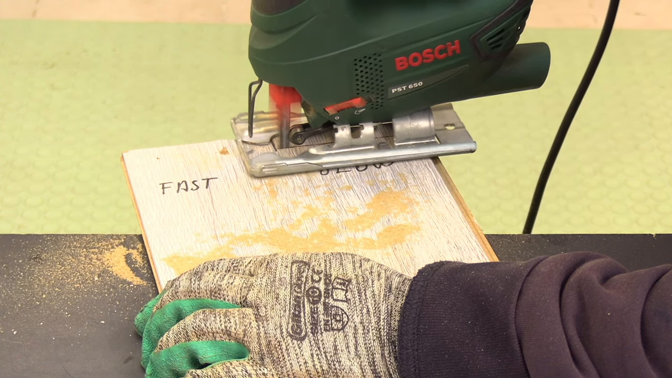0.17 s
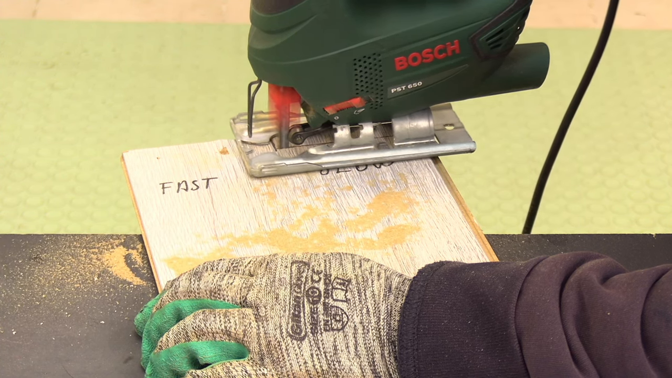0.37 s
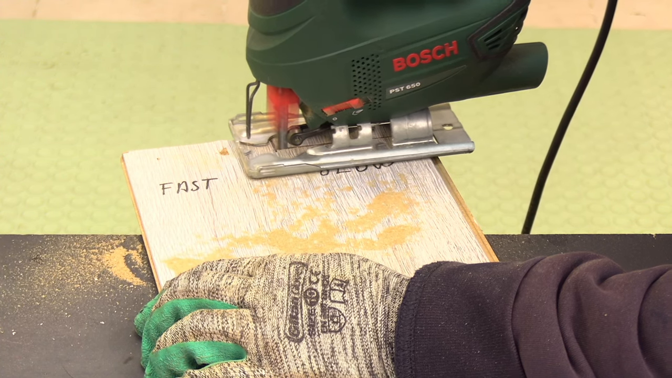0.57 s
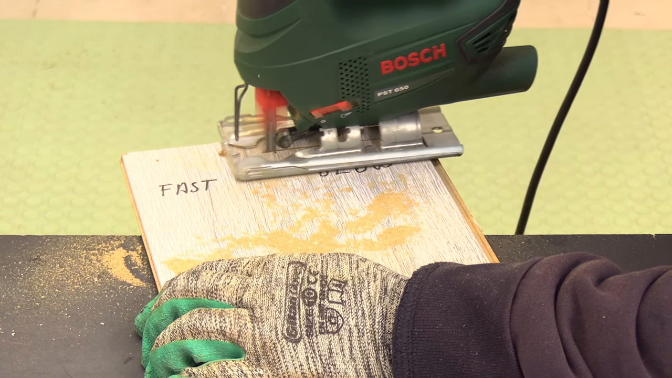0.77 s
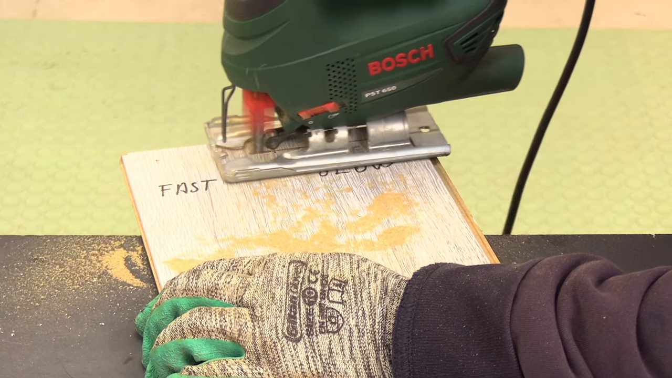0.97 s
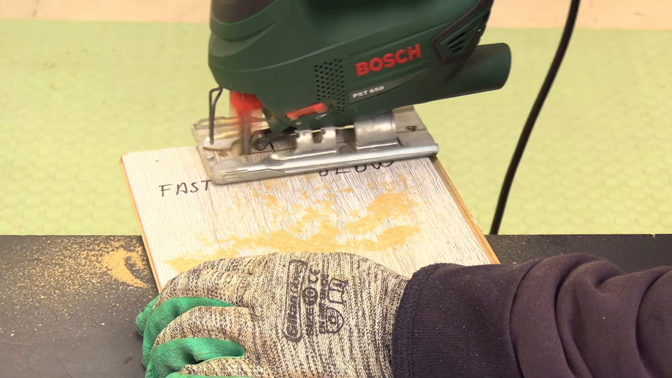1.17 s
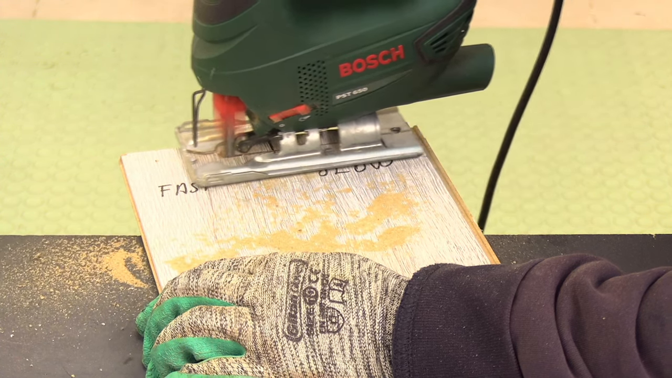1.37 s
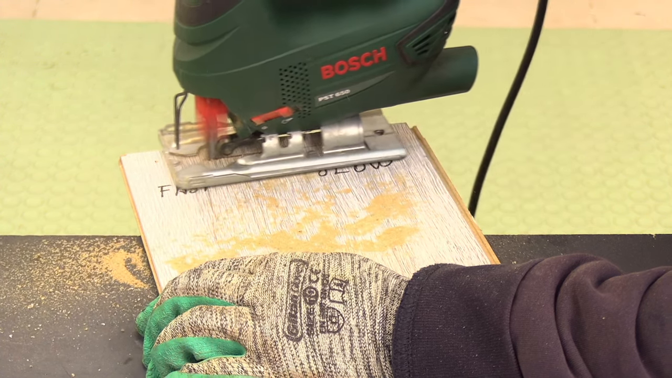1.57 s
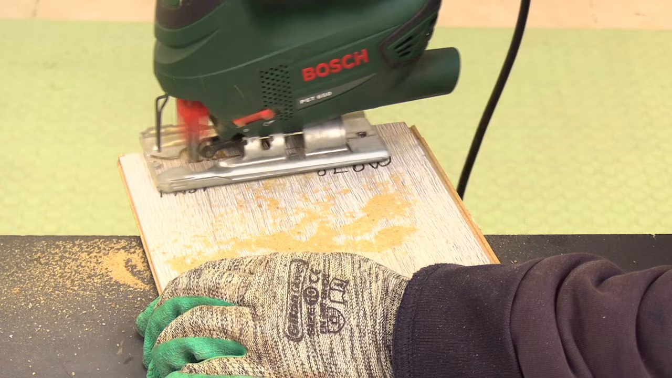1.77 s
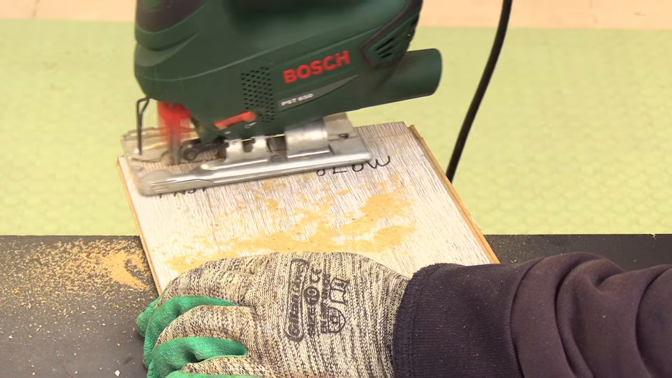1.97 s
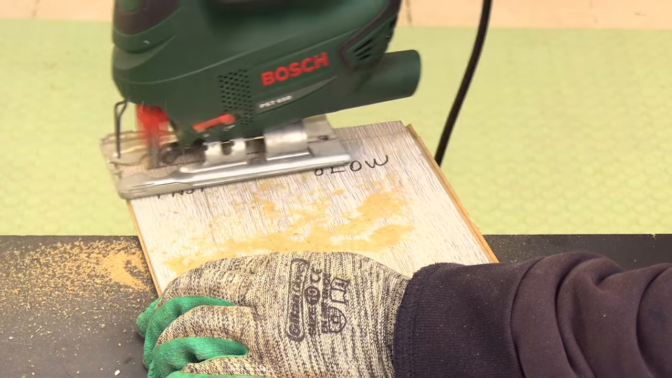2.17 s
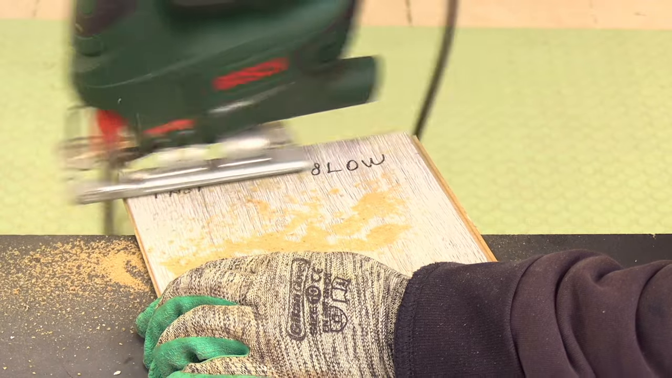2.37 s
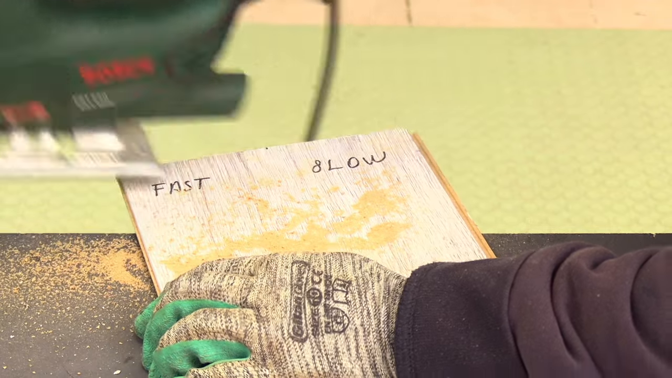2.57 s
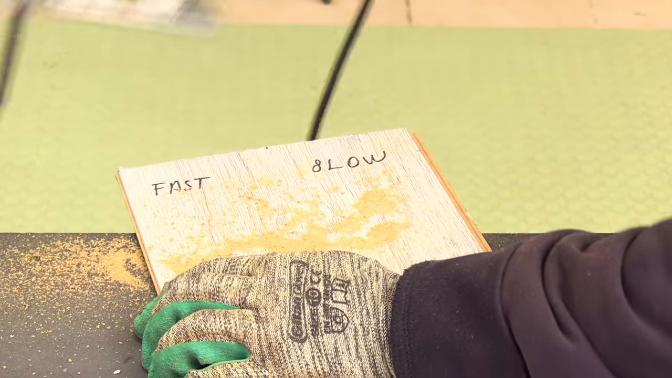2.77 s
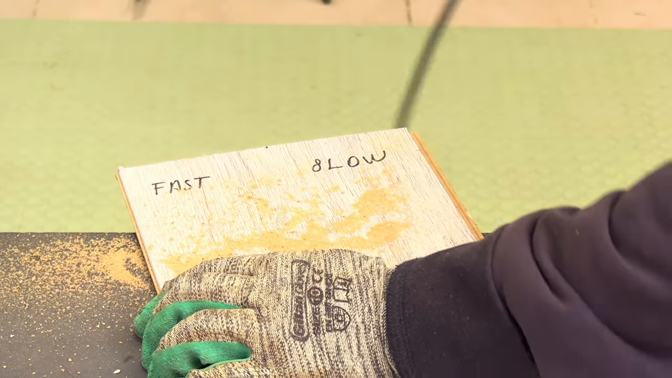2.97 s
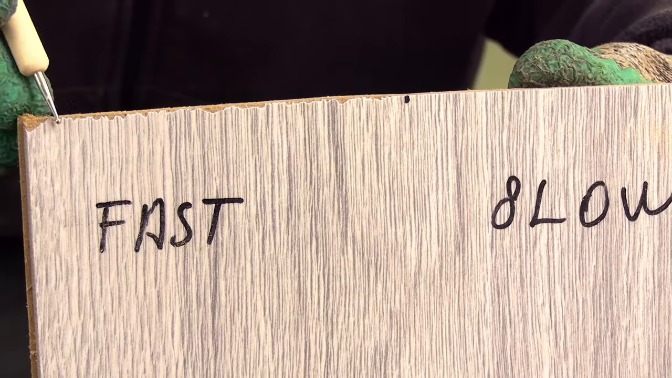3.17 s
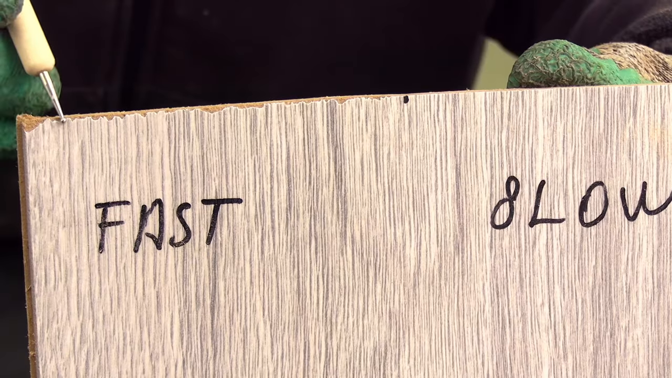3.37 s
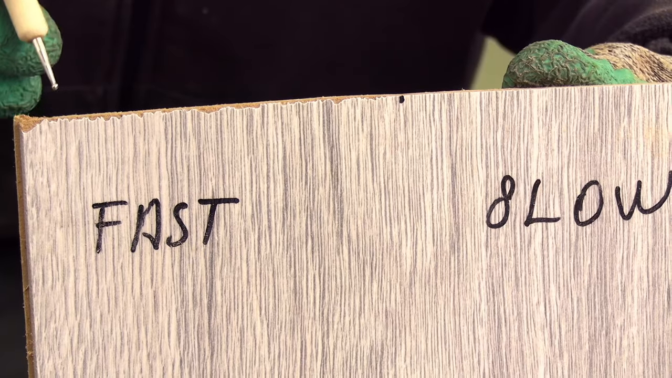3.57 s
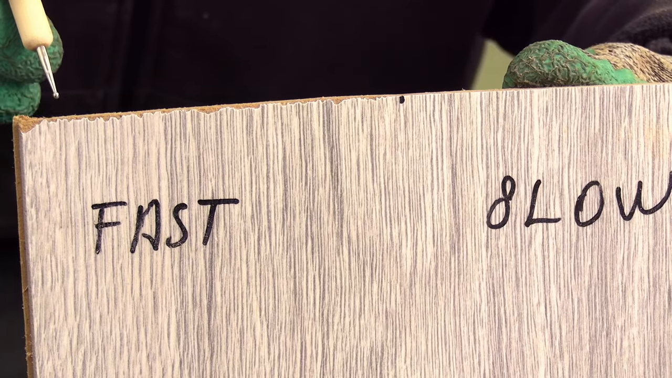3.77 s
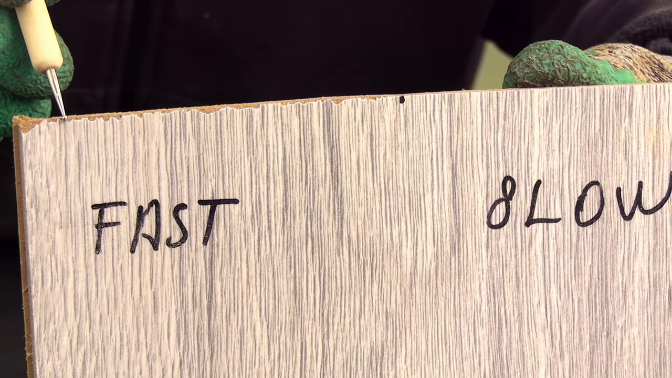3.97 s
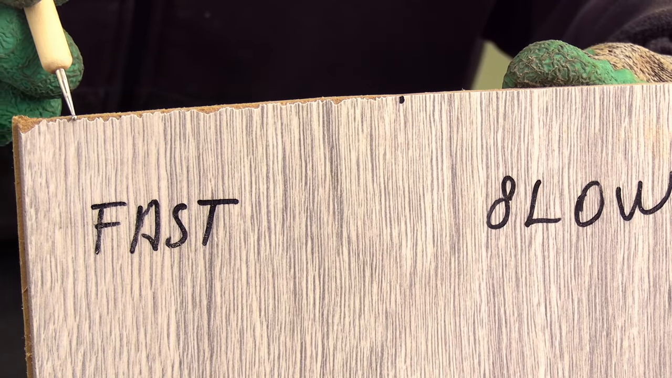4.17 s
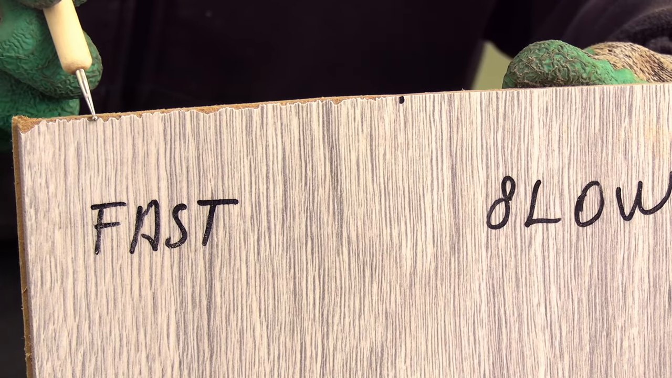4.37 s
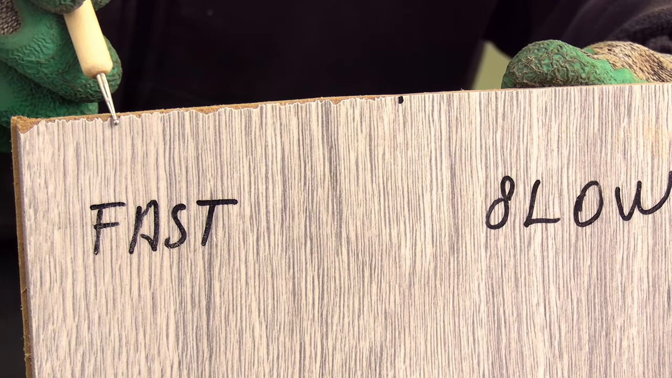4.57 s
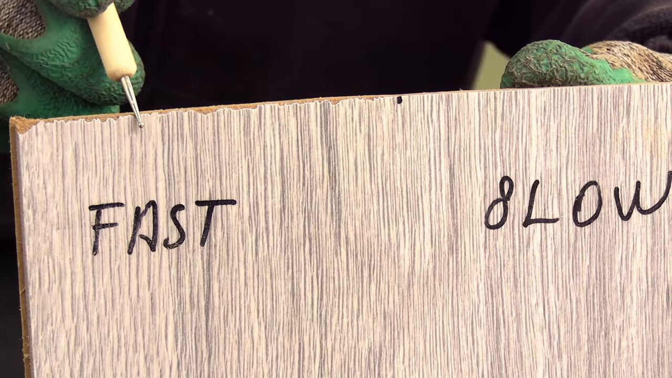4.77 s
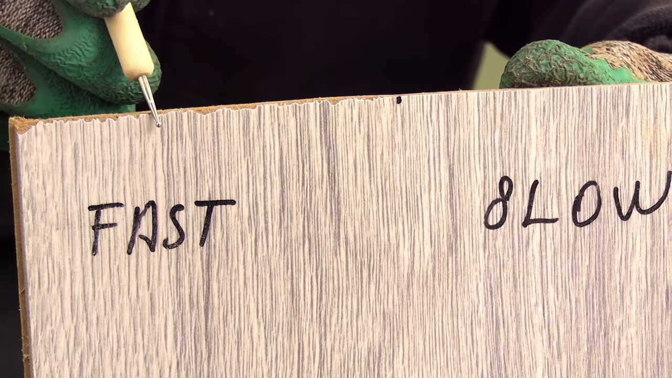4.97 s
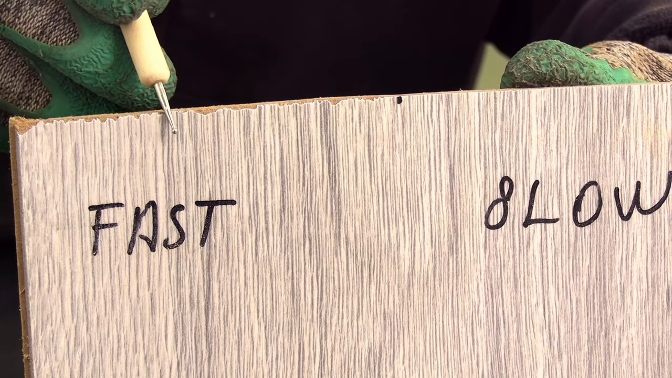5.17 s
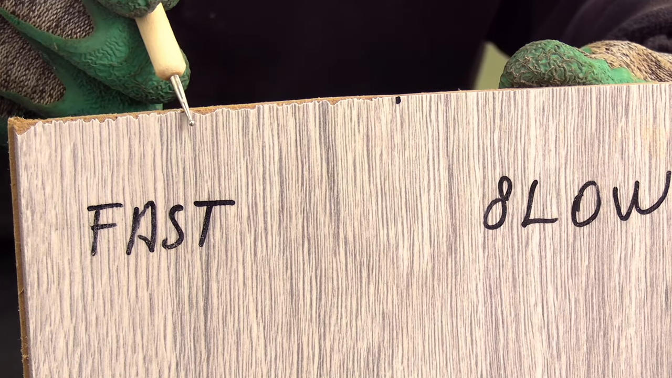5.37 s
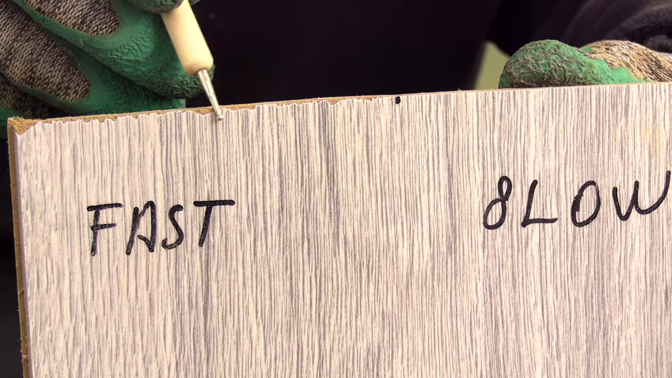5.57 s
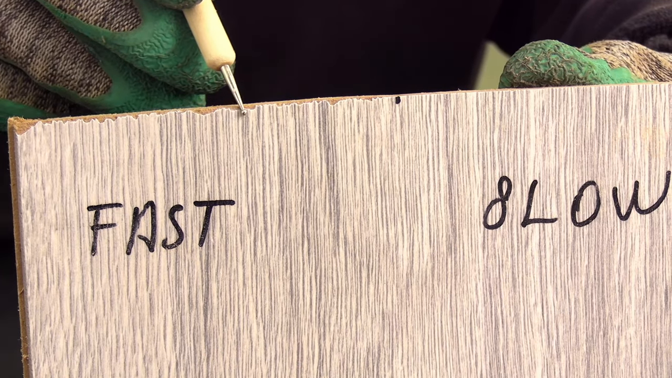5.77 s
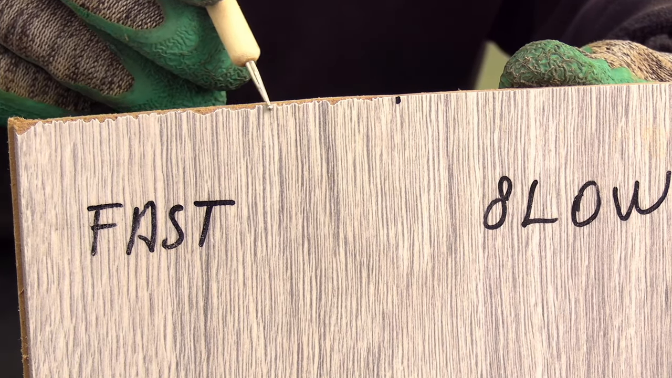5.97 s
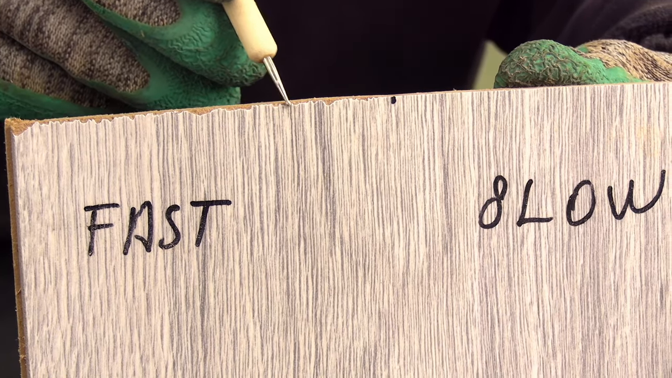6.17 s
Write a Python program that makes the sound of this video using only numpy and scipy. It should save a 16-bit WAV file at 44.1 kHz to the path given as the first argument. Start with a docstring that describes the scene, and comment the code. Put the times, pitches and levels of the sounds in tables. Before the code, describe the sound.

A jigsaw runs close by, first with a bright, high buzz, then abruptly lower as it bites into a laminate board with rasping teeth, rattling sole plate and wavering growl. The last sliver splinters, the saw lifts clear, and the noise cuts off. In the quiet, softly humming workshop, a steel point picks dry little chips from the edge.

```python
"""Jigsaw cut, then edge picking

A jigsaw buzzes, at first half again as high and brighter, then bites into a laminate board, saws through
and is lifted clear. Stroke-locked knocks, harmonics and modulated noise make gears, board and teeth; it
breaks off abruptly. In the humming workshop (wavering sines, coloured noise) a steel point then picks
chips off the cut edge: noise bursts through resonances."""
import sys
import numpy as np
from scipy import signal
from scipy.fft import rfft, irfft, next_fast_len
from scipy.io import wavfile
from scipy.ndimage import uniform_filter1d, map_coordinates

SR = 44100
rng = np.random.default_rng(int(sys.argv[2]) if len(sys.argv) > 2 else 0)


def master_out(mix):
    """Clip the mix to full scale and print it as 16-bit PCM to the path in sys.argv[1]."""
    frames = np.transpose(np.atleast_2d(mix))
    ceiling = np.clip(frames, -1, 1)
    pcm = np.round(ceiling * 32767).astype(np.int16)
    wavfile.write(sys.argv[1], SR, pcm)


N = 273861

DROP_S, STOP_S = 0.362, 3.084  # the buzz drops in pitch; the saw breaks off
GRIP_DB = 1.8  # the bite wavers

# stroke rate, sags under load, recovers when lifted: [t/s, f/Hz]
STROKE_RATE = [(0.38, 48.6), (0.7, 49.2), (1.0, 46.9), (1.45, 46.45), (1.96, 45.55), (2.44, 44.6),
               (3.08, 47)]
# stereo width of the saw, side against mid: [f/Hz, level/dB]
SAW_WIDTH = [(60, -11), (140, -22), (330, -23), (700, -13.5), (2400, -10), (4400, -6), (8100, -11.5),
             (15000, -124)]


def jigsaw():
    """The whole saw: higher opening buzz, crossfade to the cut, abrupt end."""
    rate_hz = curves(STROKE_RATE)[0] * (1 + .0015 * wobble(20))
    slow = after(DROP_S)
    lower = cutting(rate_hz) + buzz(rate_hz) + blade(rate_hz) + squeals()
    saw = np.sqrt(1 - slow) * fast_buzz() + np.sqrt(slow) * lower
    return widen(saw, SAW_WIDTH) * (1 - after(STOP_S))


# spectra of motor, rasping teeth, sole plate and board: [f/Hz, level/dB]
MOTOR_SPECTRUM = [(40, -38), (170, -16), (400, -6.5), (1100, 1), (1650, 0.5), (1950, -0.5), (2900, -0.5),
                  (4300, -4.5), (8400, -10), (11500, -14), (15800, -26)]
TEETH_SPECTRUM = [(60, -55), (500, -38), (2000, -1.5), (5300, 6.5), (7000, 1.5), (10500, -1), (12800, -34),
                  (15800, -28)]
SOLE_SPECTRUM = [(60, -50), (200, -44), (450, -6), (650, 1.5), (1000, -2), (1650, -2), (2000, -10.5),
                 (9000, -31)]
BOARD_SPECTRUM = [(40, -43), (185, -13), (255, 2.5), (350, 4.5), (680, -5.5), (3000, -54)]
# response of each part: [level in mid-cut/dB, slope on press/(dB/dB), slope on feed/(dB/dB)]
MOTOR_RESPONSE = (-18, 0.031, 0.74)
TEETH_RESPONSE = (-26, 0, 0.9)
SOLE_RESPONSE = (-24.6, 0.45, 1)
BOARD_RESPONSE = (-24, 1.62, 0)
# the last sliver splinters, once a stroke: [t/s, relative level/dB]
SPLINTERS = [(2.236, 1.5), (2.259, -4), (2.282, 1.5), (2.303, 4), (2.325, 1.5), (2.347, -5), (2.368, -0.5),
             (2.391, -2)]


def cutting(rate_hz):
    """The motor runs on while teeth tear chips, the sole plate rattles and the board rumbles."""
    motor = effort(MOTOR_RESPONSE) * coloured(machine(rate_hz, gears_db=-2.5), MOTOR_SPECTRUM)

    tearing = stroke_noise(rate_hz, upstroke_db=1.5, twice_db=2.0, flutter_db=2.5)
    teeth = effort(TEETH_RESPONSE) * coloured(tearing, TEETH_SPECTRUM)

    slaps = clatter(rate_hz, slop_ms=0.11, scatter_db=5.0, count=24, strokes=6)
    rattle = slaps + room(slaps) + amp(-10.5) * whirr(rate_hz, bins=80)
    sole = effort(SOLE_RESPONSE) * coloured(rattle, SOLE_SPECTRUM)

    growl = amp(GRIP_DB * wobble(35.35)) * whirr(rate_hz, bins=80)
    rumble = growl + slaps + amp(3) * rng.standard_normal(N)
    board = effort(BOARD_RESPONSE) * coloured(rumble, BOARD_SPECTRUM)

    snaps = placed((s, amp(db) * crackle(t60_s=0.027, spiky_db=-2, crack_db=-13)) for s, db in SPLINTERS)
    splinters = amp(5.5) * filtered(
        snaps, lambda hz: amp(along(TEETH_SPECTRUM, hz)) + amp(along(MOTOR_SPECTRUM, hz)))

    unsteady_hand = amp(0.4 * wobble(20))
    return unsteady_hand * (motor + teeth) + sole + board + splinters


# press of the saw on the board: leans in, eases near the far edge, is lifted: [t/s, level/dB]
PRESS_CURVE = [(0.42, -29.5), (0.56, -29.3), (0.68, -26.3), (0.86, -24.5), (0.98, -23.4), (1.38, -23.6),
               (1.52, -25), (1.68, -22), (1.92, -22.2), (1.99, -27), (2.42, -25.8), (2.72, -39),
               (3.04, -49)]
# bite of the teeth: [t/s, level/dB]
FEED_CURVE = [(0.52, -17.6), (0.79, -14.1), (1.1, -15.9), (1.5, -16.5), (1.8, -16.2), (2.1, -17.1),
              (2.32, -16.5), (2.5, -17.6), (3.04, -20)]
USUAL_PRESS_DB, USUAL_FEED_DB = -24, -17  # mid-cut


def effort(response):
    """Gain of one part of the saw, driven by press on the board and feed of the teeth."""
    db, per_press, per_feed = response
    press_db = curves(PRESS_CURVE)[0] - USUAL_PRESS_DB
    feed_db = curves(FEED_CURVE)[0] - USUAL_FEED_DB
    return amp(db + per_press * press_db + per_feed * feed_db)


# board resonances meeting a harmonic: [multiple of stroke rate, peak t/s, half length/s, level/dB]
BOARD_HARMONICS = [(7, 0.6, 0.3, -33), (5, 0.64, 0.2, -31.5), (6, 0.723, 0.12, -27.5),
                   (14, 0.875, 0.08, -29), (23, 0.95, .08, -31), (7, 1.09, 0.16, -30), (8, 1.08, 0.17, -30),
                   (10, 1.04, 0.14, -30.5), (9, 1.2, 0.22, -30), (5, 1.45, 0.42, -30),
                   (14, 1.5, 0.25, -31.5), (6, 1.76, 0.2, -32), (11, 2.03, 0.14, -31), (18, 2.1, 0.3, -32),
                   (7, 2.25, 0.35, -31), (14, 2.27, 0.18, -30), (16, 2.3, .15, -31)]
# the board pumps air at three times the stroke rate: [t/s, level/dB]
AIR_PUMP = [(0.39, -43), (0.52, -56), (0.7, -43), (1.55, -29.5), (1.87, -31.5), (2.02, -54), (2.11, -35.5),
            (2.34, -49), (2.44, -40), (2.7, -62.5)]
BLUR_HZ = 3  # changing load blurs each harmonic


def buzz(rate_hz):
    """Stroke harmonics swell and waver as the lengthening cut retunes the board."""
    pumped = amp(curves(AIR_PUMP)[0]) * (sine(3 * rate_hz) + amp(-29) * sine(2 * rate_hz))
    swells = np.zeros(N)
    for k, s, half_s, db in BOARD_HARMONICS:
        gain = amp(db + GRIP_DB * wobble(35.15)) * swell(s, half_s)
        swells += gain * sine(round(k) * rate_hz + BLUR_HZ * wobble(45.37))
    return pumped + swells


# blade resonance, loudest deep in the cut: [t/s, f/Hz, level/dB]
BLADE_RING = [(0.4, 2590, -32), (1.03, 2750, -31), (1.3, 2560, -33), (1.8, 2490, -27), (2.15, 2500, -31),
              (2.4, 2500, -33), (3.05, 2420, -34)]
BLADE_WIDTH_HZ = 150


def blade(rate_hz):
    """The ringing blade lifts the stroke harmonics near its drifting resonance."""
    ring_hz, db = curves(BLADE_RING)
    lines = np.zeros(N)
    for k in range(51, 61):
        hz = k * rate_hz
        resonance = 1 / (1 + (2 * (hz - ring_hz) / BLADE_WIDTH_HZ) ** 2)
        lines += resonance * sine(hz + 9 * wobble(90))
    return amp(db) * unit(lines)


# squeals, whistles, howl of the almost severed board:
# [start t/s, end t/s, start f/Hz, end f/Hz, random f deviation/Hz, level/dB]
SQUEAL_GLIDES = [(0.66, 0.9, 1600, 1600, 280, -24), (0.4, 1.6, 5600, 5250, 220, -37),
                 (0.95, 1.95, 10900, 9300, 230, -38.5), (1.715, 1.76, 10100, 10100, 130, -30),
                 (1.8, 2.22, 8350, 7900, 260, -31), (2.1, 2.5, 660, 700, 150, -27.5),
                 (2.8, 3.14, 15300, 12300, 140, -41)]
SQUEAL_LOW_HZ = 330  # high-pass corner


def squeals():
    """Narrow, rough resonances that swell, slide and fade: sines with fast random pitch."""
    out = np.zeros(N)
    for start_s, end_s, from_hz, to_hz, width_hz, db in SQUEAL_GLIDES:
        progress = np.clip((clock() - start_s) / (end_s - start_s), 0, 1)
        envelope = np.sqrt(np.abs(np.sin(np.pi * progress)))
        hz = from_hz + (to_hz - from_hz) * progress + width_hz * wobble(700)
        out += amp(db) * envelope * sine(hz)
    return filtered(out, lambda hz: 1 - np.exp(-(hz / SQUEAL_LOW_HZ) ** 4))


FAST_HZ = 74.0  # repetition rate of the opening buzz, half again as high
# clear tones of the opening buzz: [multiple of its repetition rate, level/dB]
FAST_TONES = [(3, -41), (5, -33.5), (7, -34.5), (8, -38.5), (13, -40), (15, -34), (24, -33), (47, -34),
              (112, -39)]
# spectrum of the opening buzz: [f/Hz, level/dB]
FAST_SPECTRUM = [(50, -36), (150, -16.5), (300, -4.5), (1800, 3), (3500, 2), (6500, -1), (9000, -1),
                 (11000, -5), (15800, -5.5)]


def fast_buzz():
    """The opening buzz, half again as high and brighter: a few clean tones stand out of a dense whirr."""
    rate_hz = FAST_HZ * (1 + 0.00081 * wobble(14))
    tones = sum(amp(db + 0.51 * wobble(40.0)) * sine(round(k) * rate_hz) for k, db in FAST_TONES)
    gears = machine(rate_hz, gears_db=-8) + amp(-6) * whirr(rate_hz, bins=170)
    return tones + amp(-17.0) * coloured(gears, FAST_SPECTRUM)


def machine(rate_hz, gears_db):
    """Gear and guide-roller clatter, smeared by housing and room, in the rush of the cooling fan."""
    knocks = clatter(rate_hz, slop_ms=.045, scatter_db=3.0, count=28, strokes=18)
    knocks = knocks + amp(1) * housing(knocks)
    gears = unit(knocks + amp(2.0) * room(knocks))
    fan = stroke_noise(rate_hz, upstroke_db=-1.0, twice_db=-1.5, flutter_db=1.16)
    return unit(amp(gears_db) * gears + fan)


HOUSING_T60_S = 0.011  # decay before whitening


def housing(x):
    """The plastic shell smears each knock in time, favouring no pitch: whitened decaying noise."""
    t = np.arange(SR // 50) / SR
    echo = rfft(rng.standard_normal(len(t)) * amp(-60 * t / HOUSING_T60_S))
    allpass = np.roll(irfft(echo / np.abs(echo)), len(t) // 2)
    return unit(signal.fftconvolve(x, allpass)[:N])


def clatter(rate_hz, slop_ms, scatter_db, count, strokes):
    """Knocks at count fixed crank angles, jittered in time and size; pattern drifts over some strokes."""
    turns = np.cumsum(rate_hz) / SR
    angles = np.arange(int(turns[-1]))[:, None] + rng.random(count)
    pattern = uniform_filter1d(rng.standard_normal(angles.shape), size=strokes, axis=0)
    sizes = pattern * amp(scatter_db * rng.standard_normal(angles.shape))
    s = np.interp(angles, turns, clock()) + slop_ms / 1000 * rng.standard_normal(angles.shape)
    samples = np.clip(np.round(s * SR), 0, N - 1).astype(int)
    return unit(np.bincount(samples.ravel(), sizes.ravel(), N))


def stroke_noise(rate_hz, upstroke_db, twice_db, flutter_db):
    """Noise with level cycles once (peak on the upstroke if positive) and twice a stroke, plus flutter."""
    crank = 2 * np.pi * np.cumsum(rate_hz) / SR
    force_db = upstroke_db * np.cos(crank) + twice_db * np.cos(2 * crank) + flutter_db * wobble(260)
    return unit(amp(force_db) * rng.standard_normal(N))


def whirr(rate_hz, bins):
    """Even comb of weak harmonics: a mechanism that repeats exactly every stroke."""
    stroke = irfft(np.exp(2j * np.pi * rng.random(bins)))
    turns = np.cumsum(rate_hz) / SR
    return unit(map_coordinates(stroke, [turns % 1 * len(stroke)], mode="grid-wrap"))


# chips breaking off: [t/s, level/dB, treble level/dB]
CHIP_EVENTS = [(3.3555, -33.5, -21), (3.421, -42, -25), (3.9799, -42.5, -29), (4.445, -43, -19),
               (4.76, -40, -15), (4.7726, -37.5, -18), (4.9120, -32.5, -14), (4.944, -36, -19),
               (4.98, -42, -20), (4.994, -33, -17.5), (5.0287, -36, -36), (5.235, -40.5, -23),
               (5.254, -39.5, -11), (5.2867, -40, -14), (5.334, -29.5, -8.5), (5.449, -39.5, -22),
               (5.6394, -39.5, -17), (5.673, -32, -17), (5.878, -42, -17), (5.948, -38, -18),
               (5.9717, -28.5, -10.5), (5.989, -42, -20), (6.0134, -33.5, -8), (6.108, -35, -21),
               (6.141, -39.5, -22)]
# the glove rubs on the board, most while taking hold: [t/s, level/dB]
GLOVE_RUB = [(3.2, -58), (3.7, -65)]
# the point slides without catching: [t/s, half length/s, level/dB]
POINT_SLIDES = [(3.172, 0.028, -64), (4.29, .04, -63.5), (4.542, 0.035, -60)]
# edge hiss under the sliding point: [f/Hz, width/Hz, level/dB]
SLIDE_MODES = [(3700, 700, 0)]
DRAG_HALF_S, DRAG_LAG_S, DRAG_DB = 0.042, 0.018, -32.5  # drag around each chip, dB against the chip


def picking():
    """Chips crack off singly; the point drags around each and slides in between; the glove rubs."""
    chips = placed((s, chip(s, db, treble_db)) for s, db, treble_db in CHIP_EVENTS)
    drags = sum(amp(db + DRAG_DB) * swell(s + DRAG_LAG_S, DRAG_HALF_S) for s, db, _ in CHIP_EVENTS)
    friction = np.hypot(amp(curves(GLOVE_RUB)[0]), drags)
    grit = amp(1.2 * wobble(82)) * rng.standard_normal(N)
    scrape_spectrum = [(100, -17), (900, -6.0), (2800, -4.0), (4000, -4.0),
                       (5500, -3.5), (8200, -7.5), (10000, -18), (15800, -29)]  # f/Hz, level/dB
    scrape = friction * coloured(grit, scrape_spectrum)
    hiss = unit(ring(rng.standard_normal(N), SLIDE_MODES))
    slides = sum(amp(db) * swell(s, half_s) for s, half_s, db in POINT_SLIDES) * hiss
    return chips + amp(-7.0) * room(chips) + scrape + slides


# modes of board edge, steel point and snapping coating: [f/Hz, width/Hz, level/dB]
EDGE_MODES = [(1130, 75, 8.5), (1430, 260, -4), (1703, 190, 0), (2370, 200, -6), (2940, 100, -10.5)]
POINT_MODES = [(3980, 160, 2.5), (4360, 140, 2), (4770, 170, -5), (5370, 280, -8), (6000, 250, -8),
               (8460, 260, -11), (12300, 650, -26)]
COATING_SNAP = [(5200, 1700, -18)]
USUAL_TREBLE_DB, DULLING_DB_PER_DB = -19.5, 0.26  # a soft chip spares the upper edge modes


def chip(s, db, treble_db):
    """One chip snaps off drily and rings edge and steel point, a little differently at each spot."""
    edge = at_spot(EDGE_MODES)
    tilt = amp(DULLING_DB_PER_DB * (treble_db - USUAL_TREBLE_DB))
    crack = crackle(t60_s=0.036, spiky_db=2, crack_db=-4)
    wood = unit(ring(crack / tilt, edge[:1]) - ring(crack * tilt, edge[1:]))
    tap = crackle(t60_s=0.04, spiky_db=2, crack_db=-12)
    steel = unit(ring(tap, at_spot(POINT_MODES)))
    snap = amp(COATING_SNAP[0][2]) * unit(ring(crack, COATING_SNAP))
    treble = amp(treble_db) * (amp(-14.5) * steel + snap)
    return amp(db) * (amp(-20) * wood + treble)


SPOT_DETUNE, SPOT_DB = .012, 1.4  # spread per spot: pitch share, level


def at_spot(modes):
    """The same modes, shifted a little at random in pitch and level."""
    return [(hz * (1 + SPOT_DETUNE * rng.normal()), width_hz, db + SPOT_DB * rng.normal())
            for hz, width_hz, db in modes]


def crackle(t60_s, spiky_db, crack_db):
    """One crack (an impulse) and a short, dying noise burst of tiny fractures."""
    t = np.arange(SR // 10) / SR
    sizes_db = spiky_db * rng.standard_normal(len(t))
    burst = rng.standard_normal(len(t)) * amp(sizes_db - 60 * t / t60_s)
    return burst / np.linalg.norm(burst) + amp(crack_db) * (t == 0)


def ring(x, modes):
    """x through a bank of two-pole resonances of alternating sign."""
    m = next_fast_len(len(x))
    f = np.fft.rfftfreq(m, 1 / SR)
    response = 0
    for k, (hz, width_hz, db) in enumerate(modes):
        mode = 1j * f * width_hz / (hz * hz - f * f + 1j * f * width_hz)
        response = response + (-1) ** k * amp(db) * mode
    return irfft(rfft(x, m) * response, m)[:len(x)]


DRONE_HZ, DRONE_DB = 211.7, -45
# brief swells and dips of the drone: [t/s, half length/s, level change/dB]
DRONE_CHANGES = [(3.15, 0.25, -5.5), (3.607, 0.049, -9), (3.9, 0.15, 2.5), (4.16, 0.061, -9),
                 (4.41, .04, -8), (4.58, 0.084, 3), (5.426, .12, 6), (6.03, .05, 5), (6.2, 0.072, -5.5)]
# faint tones of the droning machine: [f/Hz, level/dB]
UPPER_TONES = [(629.8, -64), (737.5, -63.5)]
# spectrum of the room air: [f/Hz, level/dB]
AIR_SPECTRUM = [(25, -45), (68, -0.5), (105, -12), (160, 10), (270, -2), (370, 5.5), (480, -1), (740, 0.5),
                (1300, -10.5), (2500, -13.5), (15800, -28.5)]


def workshop():
    """A machine's swelling drone with faint upper tones, a wavering lower hum and the air of the room."""
    changes_db = sum(db * swell(s, half_s) for s, half_s, db in DRONE_CHANGES)
    drone_db = DRONE_DB + 0.68 * wobble(18) + changes_db
    drone = amp(drone_db) * sine(DRONE_HZ + 0.49 * wobble(3.7))
    low_hum = amp(-57.5 + 1.2 * wobble(7.7)) * sine(149.8 + 1.06 * wobble(8.3))
    tones = sum(amp(db) * sine(hz + 3 * wobble(12)) for hz, db in UPPER_TONES)
    air = amp(-52.5) * coloured(rng.standard_normal(N), AIR_SPECTRUM)
    return drone + low_hum + tones + air


# reverberation of the workshop: [f/Hz, t60/s]
ROOM_DECAY = [(150, 0.28), (1000, 0.29), (4000, 0.38), (14000, 0.18)]


def room(x):
    """Diffuse echo of the workshop: noise tail of unit energy, decay set per frequency."""
    hz, t, z = signal.stft(rng.standard_normal(SR // 2), SR, nperseg=256)
    decay = amp(-60 * t / along(ROOM_DECAY, hz)[:, None])
    tail = signal.istft(z * decay, SR, nperseg=256)[1]
    return signal.fftconvolve(x, tail / np.linalg.norm(tail))[:N]


def widen(x, width):
    """Add a diffuse side signal, opposite in left and right, with level set per frequency."""
    side = filtered(room(x), lambda hz: amp(along(width, hz)))
    return np.array([x + side, x - side])


def amp(db):
    """Decibels to gain."""
    return 10 ** (np.asarray(db) / 20)


def unit(x):
    """Scale to rms 1."""
    return x / np.sqrt(np.mean(x ** 2) + 1e-20)


def clock():
    """Time of every sample, s."""
    return np.arange(N) / SR


def along(points, hz):
    """Interpolate (Hz, value) points on a log frequency axis."""
    f, v = np.transpose(points)
    return np.interp(np.log(hz + 1), np.log(f + 1), v)


def curves(rows):
    """One value per sample for each column after the time."""
    s, *cols = np.transpose(rows)
    return [np.interp(clock(), s, c) for c in cols]


def wobble(knots_per_s):
    """A smooth random curve: spline through normal knots."""
    knots = rng.standard_normal(int(N * knots_per_s / SR) + 4)
    coarse = np.arange(0, N + 16, 16)
    return np.interp(np.arange(N), coarse, map_coordinates(knots, [coarse * knots_per_s / SR]))


def after(s):
    """A switch from 0 to 1 in an 8 ms ramp centred on s."""
    return np.clip((clock() - s) / .008 + .5, 0, 1)


def swell(s, half_s):
    """A smooth (Gaussian) rise and fall around time s."""
    return np.exp(-((clock() - s) / half_s) ** 2)


def sine(hz):
    """A sine of rms 1 that follows a frequency curve."""
    return np.sqrt(2) * np.sin(2 * np.pi * (np.cumsum(hz * np.ones(N)) / SR + rng.random()))


def filtered(x, response):
    """x times a response of frequency."""
    m = next_fast_len(N + SR // 2)
    return irfft(rfft(x, m) * response(np.fft.rfftfreq(m, 1 / SR)), m)[..., :N]


def coloured(x, spectrum):
    """x shaped by a spectrum, at rms 1."""
    return unit(filtered(x, lambda hz: amp(along(spectrum, hz))))


def placed(sounds):
    """Lay (s, sound) pairs on the time line."""
    out = np.zeros(N + SR)
    for s, sound in sounds:
        out[round(s * SR):][:len(sound)] += sound
    return out[:N]


# stereo width of the quiet shop, side against mid: [f/Hz, level/dB]
SHOP_WIDTH = [(200, -29), (700, -13.5), (2400, -6), (8100, -5.5), (15000, -17)]
SHOP_PAN_DB = 0.1  # right up, left down


def scene():
    """First the saw, then the quiet shop."""
    shop = widen(picking() + workshop(), SHOP_WIDTH) * amp([[-SHOP_PAN_DB], [SHOP_PAN_DB]])
    return jigsaw() + after(STOP_S) * shop


TOP_HZ = 15900  # band limit


def record(dry):
    """Round off peaks, then cut everything above the band limit."""
    rounded = dry / (1 + np.abs(dry / .95) ** 6) ** (1 / 6)
    return filtered(rounded, lambda hz: hz < TOP_HZ)


dry = scene()
out = record(dry)
master_out(out)
```